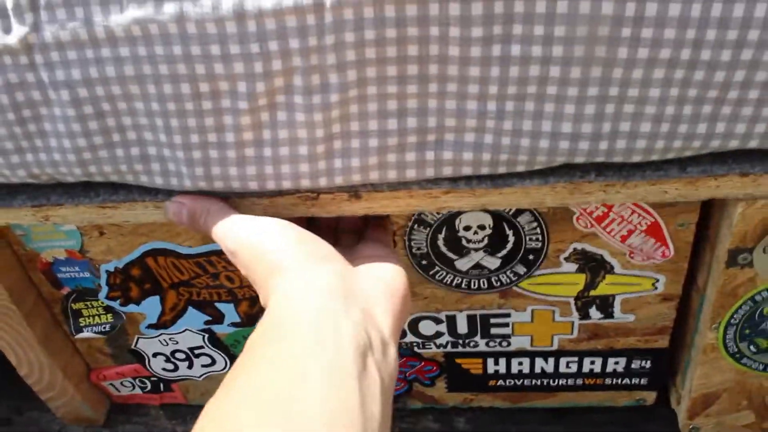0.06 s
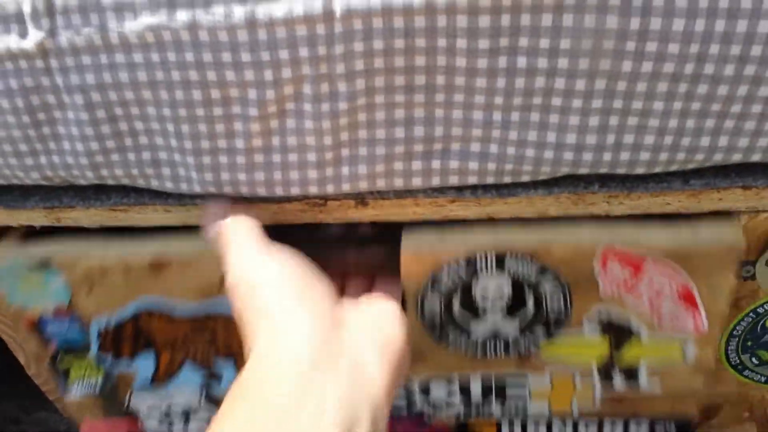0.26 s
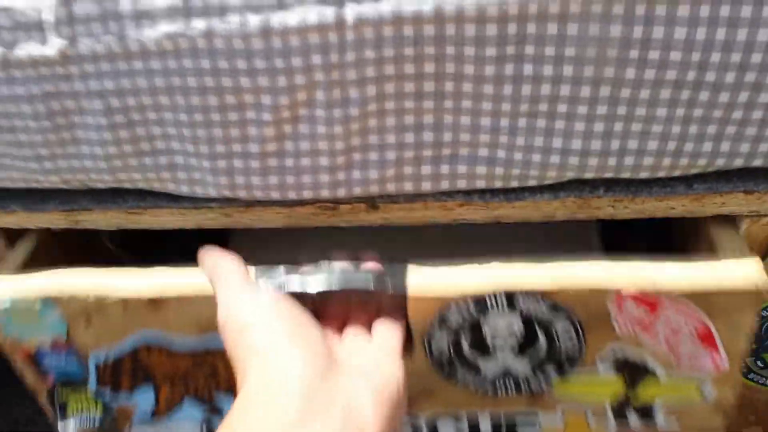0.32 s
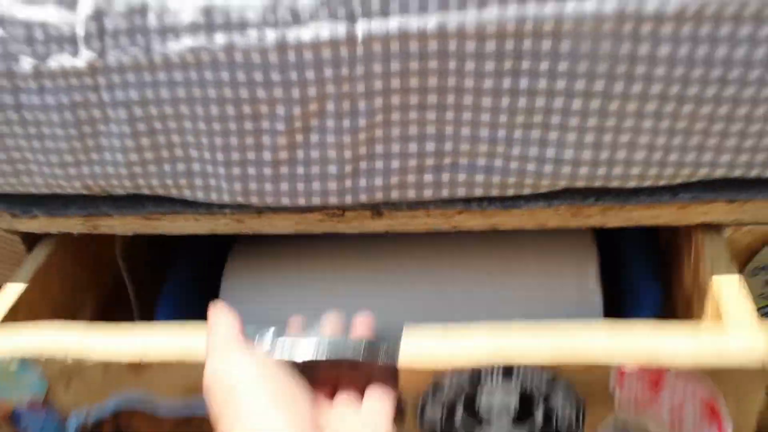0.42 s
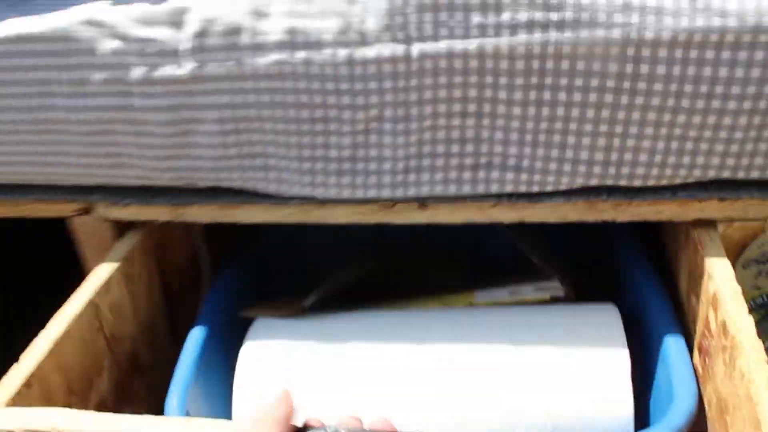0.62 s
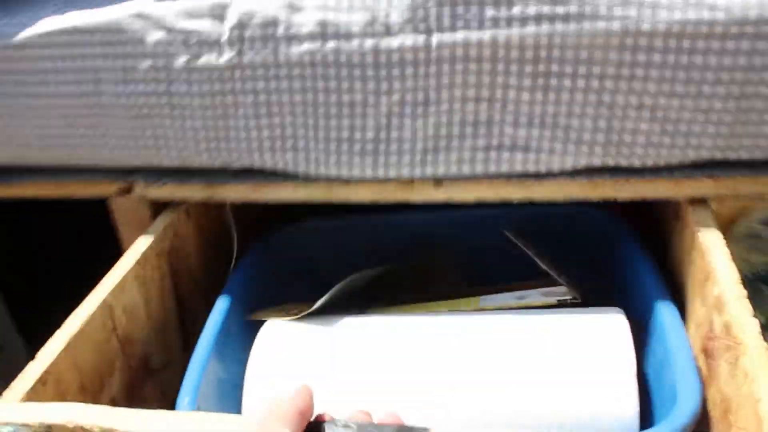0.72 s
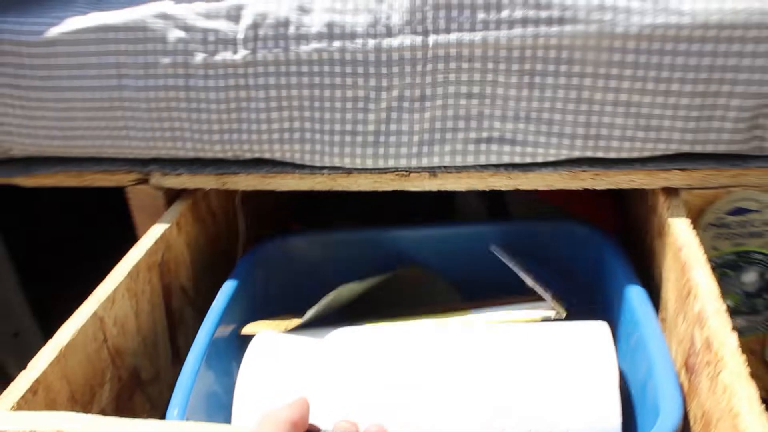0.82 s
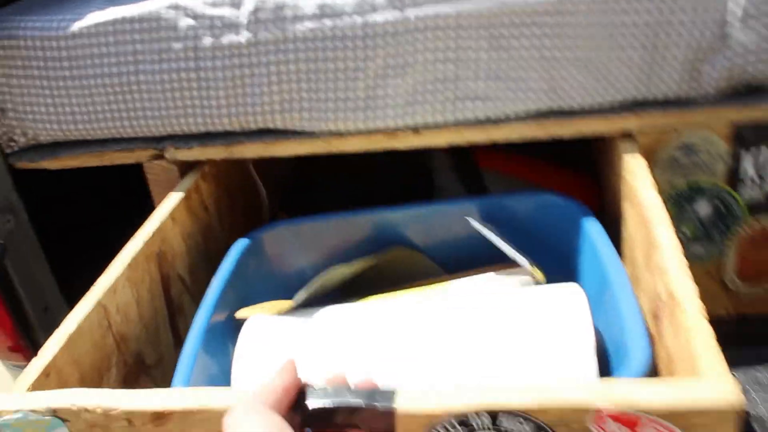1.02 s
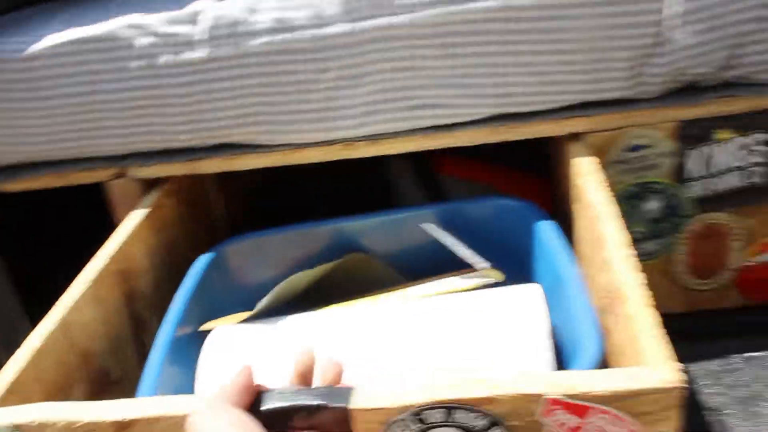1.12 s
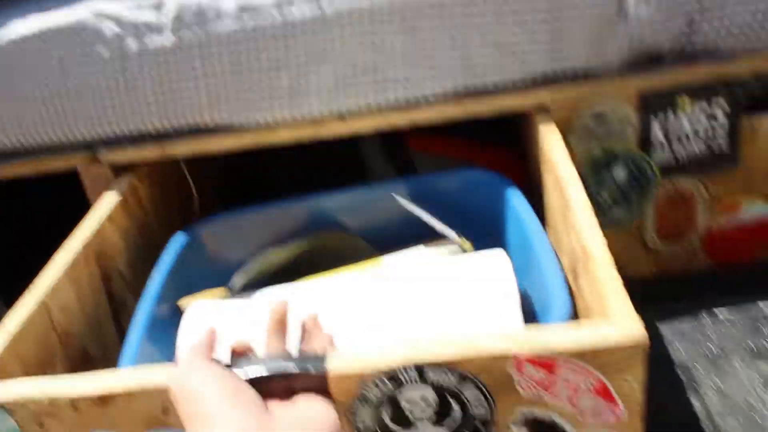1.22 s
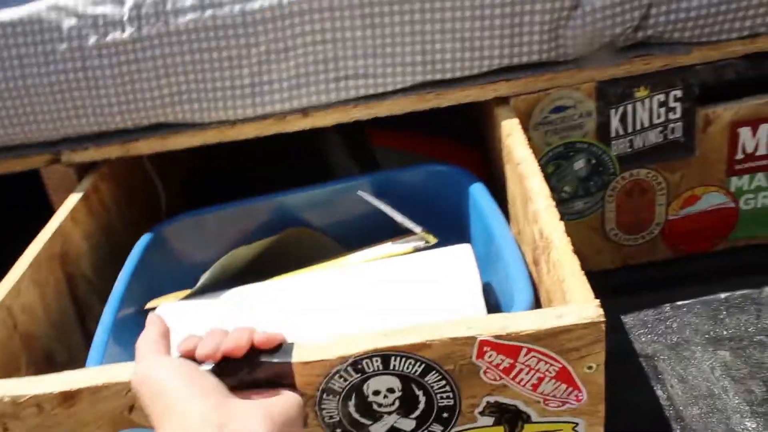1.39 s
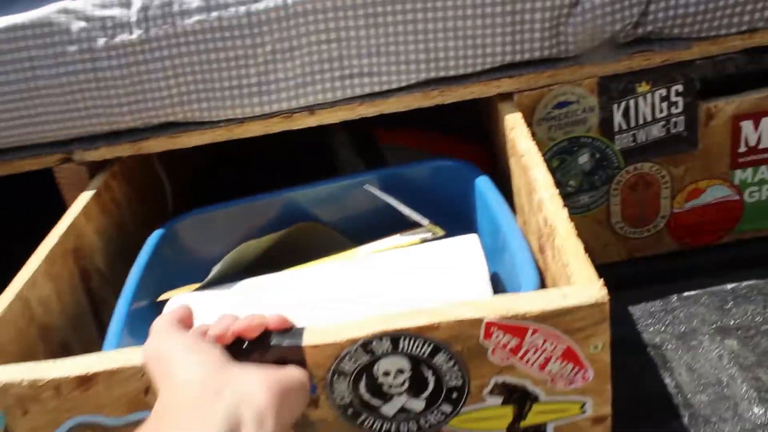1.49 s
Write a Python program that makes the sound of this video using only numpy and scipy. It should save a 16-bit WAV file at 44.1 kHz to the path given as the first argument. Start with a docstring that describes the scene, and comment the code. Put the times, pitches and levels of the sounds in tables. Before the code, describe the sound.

A wooden drawer is pulled open in a parked vehicle, scraping and juddering with low knocks and small rattles, then stopping before a brief scuff and faint ticks; close microphone, faint distant traffic behind.

```python
"""Plywood drawer pulled from a bed platform

A hand pulls the drawer out in a parked vehicle, over a far traffic wash of shaped noise.
Uneven clicks of wood slipping on wood ring the frame, the box (its tone changes on the way out) and thin panels.
Contents rustle as swells of crackle and tick as dying rings; low rings are the jolts.
Wavering tones hum where slips lock to a resonance, and faint squeaks are narrow noise.
A short dense scuff comes late, with a few faint ticks after it.
"""
import sys
import numpy as np
from scipy import signal
from scipy.io import wavfile

SR = 44100
rng = np.random.default_rng(int(sys.argv[2]) if len(sys.argv) > 2 else 0)


def materialize(psi):
    """Save the field psi as 16-bit PCM at rate SR to the path in sys.argv[1].

    A 1-D psi becomes a single channel; in a 2-D psi each row is a channel.
    """
    bounded = np.clip(np.atleast_2d(psi).T, -1, 1)
    quanta = np.round(bounded * 32767).astype(np.int16)
    wavfile.write(sys.argv[1], SR, quanta)


N = 68355
TIME_S = np.arange(N) / SR


def amp(db):
    """Decibels to linear gain."""
    return 10 ** (np.asarray(db) / 20)


def evened(x):
    """Scale to an rms of 1."""
    return x / np.sqrt(np.mean(x ** 2) + 1e-20)


def filtered(x, order, hz, kind="low"):
    """Butterworth low-pass or high-pass."""
    return signal.sosfilt(signal.butter(order, hz, kind, fs=SR, output="sos"), x)


def coloured(x, points):
    """Minimum-phase filter with the table's spectrum, falling away below its first point; rms 1."""
    point_hz, point_db = np.transpose(points)
    hz = abs(np.fft.fftfreq(4096, 1 / SR))
    log_gain = np.interp(np.log(hz + 1), np.log(point_hz), point_db) * np.log(10) / 20
    log_gain += 2 * np.log(np.clip(hz / point_hz[0], 1e-4, 1))
    # the Hilbert transform of the log gain gives the phase of a causal filter
    taps = np.fft.ifft(np.exp(np.conj(signal.hilbert(log_gain)))).real[:2048]
    return evened(signal.oaconvolve(x, taps)[:N])


def drift(cutoff_hz):
    """Random wavering of rms 1: noise low-passed at the cutoff."""
    return evened(filtered(rng.standard_normal(N), 2, cutoff_hz))


def slips(per_s, spread_db):
    """Stick and slip as random clicks of uneven size and either sign."""
    chance = rng.random(N)
    size = np.minimum(rng.exponential(1, N), 4)
    sign = rng.choice([-1., 1.], N)
    return (chance < per_s / SR) * sign * amp(spread_db * size)


def ring(x, hz, width_hz):
    """One damped mode as a two-pole resonator; a wider mode dies sooner."""
    r = np.exp(-np.pi * width_hz / SR)
    return evened(signal.lfilter([1, 0, -1], [1, -2 * r * np.cos(2 * np.pi * hz / SR), r * r], x))


def fuzzy_tone(hz, width_hz):
    """Noise through the same resonance twice: a rough tone around one pitch."""
    return ring(ring(rng.standard_normal(N), hz, width_hz), hz, width_hz)


# spectrum of far traffic and hiss: pitch_hz, relative_db_per_hz
WASH_SPECTRUM = [(15, -8), (25, -7), (783, 2), (946, 0.5), (1240, -4), (1660, -12), (1960, -14.5),
                 (2180, -19), (3170, -26), (4630, -27.5), (7710, -33.5), (15500, -34.5)]
WASH_DB, WASH_WAVER_DB, WASH_WAVER_HZ = -46.5, 1.4, 11.6


def wash():
    """Far traffic and microphone hiss: shaped noise, gently wavering."""
    level_db = WASH_DB + WASH_WAVER_DB * drift(WASH_WAVER_HZ)
    return amp(level_db) * coloured(rng.standard_normal(N), WASH_SPECTRUM)


def rung(x, modes, free):
    """Clicks ring a set of modes whose strengths change as the drawer comes out."""
    total, power = 0, 0
    for k, (hz, width_hz, enclosed_db, free_db) in enumerate(modes):
        gain = amp(enclosed_db + (free_db - enclosed_db) * free)
        total = total + (-1) ** k * gain * ring(x, hz, width_hz)  # alternating polarity
        power = power + gain ** 2
    return total / np.sqrt(power)


# course of the pull: time_s, frame_rumble_db, box_db, panel_scrape_db, grit_db
PULL_LEVELS = [(0.14, -51, -84, -82, -91), (0.162, -53, -68, -91, -89), (0.175, -45, -60, -43.5, -49),
               (0.189, -31, -57, -64, -57.5), (0.204, -31.5, -37.5, -48.5, -50),
               (0.268, -34.5, -29.5, -38, -42.5), (0.334, -30.5, -37, -37.5, -44),
               (0.356, -40, -36, -45.5, -44.5), (0.394, -45.5, -34.5, -38, -46),
               (0.46, -21, -32, -36.5, -47), (0.483, -44, -32.5, -34, -47.5),
               (0.51, -27, -26.5, -32, -48.5), (0.524, -27.5, -32.5, -40.5, -46),
               (0.592, -39, -36, -33, -45.5), (0.63, -28, -30, -32, -43), (0.734, -29, -34, -38.5, -48),
               (0.788, -36.5, -29, -35, -46), (0.818, -25.5, -32.5, -37, -45.5),
               (0.895, -31, -32.5, -34.5, -42), (0.928, -27.5, -27, -34, -44),
               (1.004, -30.5, -40, -43, -49), (1.018, -41, -43, -48.5, -51), (1.045, -33, -39, -44, -53),
               (1.07, -38, -41, -68, -56), (1.15, -54, -49, -59, -57), (1.276, -53, -69, -60, -60.5),
               (1.3, -69, -59, -55, -61)]
# modes of frame, box and thin panels: pitch_hz, width_hz, enclosed_relative_db, free_relative_db
FRAME_MODES = [(58.3, 51, 0.5, -2), (91.7, 50, -2, -6.5), (124.7, 56, 2.5, 10), (153.6, 30, -2.5, 5.5),
               (175.4, 5.9, -1, 3.5)]
BOX_MODES = [(240.6, 43, -8.5, -4), (319, 21.4, 3.5, -7), (351, 34, -1.5, -10.5), (400, 34.5, 0, -9.5),
             (491.4, 29, -6, -9), (565, 105, -7.5, -10.5)]
PANEL_MODES = [(649, 140, 2.2, 16), (835, 74, 12, 12.5), (913, 192, 26, 11), (1140, 264, 24.8, 11),
               (1376, 113, 23.4, 8.5), (1499, 28, 19.9, 5.5), (1620, 145, 20.7, 6.5),
               (1814, 50, 20.5, -2.5), (1952, 94, 23.2, -1)]
# spectrum of the fine grit: pitch_hz, relative_db
GRIT_SPECTRUM = [(2200, 14), (2900, 11), (3700, 5), (5000, 1.5), (6500, -3.5), (8500, -14), (15000, -22)]
# in order: frame, box, panels, grit
SLIPS_PER_S, SLIP_SPREAD_DB = (1500, 2000, 2200, 4000), (1.3, 1.5, 2.2, 2.2)
JUDDER_HZ, JUDDER_DB = 44, (0.46, 0.96, 0.83, 1.3)
CONTACT_HZ = (494, 1190, 3080)  # soft wood contact dulls the slips: frame, box, panels
OUT_MID_S, OUT_SPAN_S = 0.603, 0.042  # the box passes from mostly enclosed to mostly free


def drawer():
    """Slips under one shared judder drive frame, box, panels and grit."""
    free = .5 + .5 * np.tanh((TIME_S - OUT_MID_S) / OUT_SPAN_S)
    judder = drift(JUDDER_HZ)
    drive = [slips(n, spread_db) * amp(judder_db * judder)
             for n, spread_db, judder_db in zip(SLIPS_PER_S, SLIP_SPREAD_DB, JUDDER_DB)]
    parts = []
    for x, contact_hz, modes in zip(drive, CONTACT_HZ, (FRAME_MODES, BOX_MODES, PANEL_MODES)):
        parts.append(evened(rung(filtered(x, 2, contact_hz), modes, free)))
    parts.append(coloured(drive[-1], GRIT_SPECTRUM))
    time_s, *levels_db = np.transpose(PULL_LEVELS)
    return sum(amp(np.interp(TIME_S, time_s, level_db, left=-120, right=-120)) * part
               for level_db, part in zip(levels_db, parts))


# ticks of small things: start_s, level_db, pitch_hz, t60_s, roughness_0_to_1
TICK_EVENTS = [(0.172, -39, 2000, 0.06, 0.53), (.2965, -23, 1910, .025, .3), (0.3107, -27, 1470, .012, .2),
               (.330, -24, 1967, 0.042, 0.44), (.332, -25, 1096, .05, 0.65), (0.495, -36, 2950, 0.025, 0),
               (0.505, -31, 3110, 0.069, 0.36), (.507, -22, 1887, 0.041, 0.62),
               (0.532, -28, 1930, 0.022, 0.2), (1.172, -54, 6000, 0.0074, .5),
               (1.227, -40.5, 1840, 0.05, 0.69), (1.260, -46, 3120, 0.015, .6),
               (1.3509, -23, 870, 0.011, 0), (1.36, -25, 2000, 0.005, 0.2), (1.37, -28.5, 1350, 0.011, 0),
               (1.369, -36, 3040, 0.019, 0.3), (1.495, -48.5, 4100, 0.02, 0.18),
               (1.497, -48.5, 5250, 0.018, 0.3), (1.496, -43, 2210, 0.012, 0.7)]
TICK_WIDTH_SHARE = .16  # width of the rough part, as a share of the pitch
TICK_RISE_S = 0.00029


def ticks():
    """Each tick is a dying ring, more or less roughened around its pitch."""
    out = np.zeros(N)
    for start_s, level_db, hz, t60_s, rough in TICK_EVENTS:
        t = np.maximum(TIME_S - start_s, 0)
        rough = np.clip(rough, 0, 1)
        envelope = amp(level_db - 60 * t / t60_s) * (1 - np.exp(-t / TICK_RISE_S))
        fuzz = fuzzy_tone(hz, TICK_WIDTH_SHARE * hz)
        out += envelope * (rough * fuzz - (1 - rough) * np.sin(2 * np.pi * hz * t))
    return out


# bright rustles of the contents: start_s, length_s, level_db
RUSTLE_SWELLS = [(0.218, 0.13, -53), (0.321, 0.022, -52), (0.489, 0.055, -54.5), (0.586, 0.027, -47),
                 (0.603, 0.049, -46.5), (0.675, 0.043, -51), (0.768, 0.072, -53.5), (1.31, 0.099, -59.5)]
# spectrum of the rustle: pitch_hz, relative_db
RUSTLE_SPECTRUM = [(3000, 2.5), (5000, 2.5), (8000, -6), (12000, -17), (15500, -11)]
RUSTLE_SKEW = .55  # below 1 the swell rises faster than it falls


def rustles():
    """The contents shift: fine crackle in short swells that start quickly."""
    power = np.zeros(N)
    for start_s, length_s, level_db in RUSTLE_SWELLS:
        progress = np.clip((TIME_S - start_s) / length_s, 0, 1)
        power += amp(2 * level_db) * np.sin(np.pi * progress ** RUSTLE_SKEW)
    return np.sqrt(abs(power)) * coloured(slips(6000, spread_db=2.2), RUSTLE_SPECTRUM)


# the drawer jolts: start_s, level_db, pitch_hz, t60_s
KNOCK_EVENTS = [(0.336, -14, 132.4, 0.083), (.452, -13, 107, 0.11), (.995, -23, 117.7, 0.13),
                (1.152, -17, 90.5, 0.023)]
KNOCK_RISE_CYCLES = 0.97


def knocks():
    """Each jolt is one low dying ring."""
    out = np.zeros(N)
    for start_s, level_db, hz, t60_s in KNOCK_EVENTS:
        t = np.maximum(TIME_S - start_s, 0)
        rise = 1 - np.exp(-t * hz / KNOCK_RISE_CYCLES)
        out -= amp(level_db - 60 * t / t60_s) * rise * np.sin(2 * np.pi * hz * t)
    return out


HOLLOW_SMALL_HZ, HOLLOW_LARGE_HZ, HOLLOW_MID_S, HOLLOW_SPAN_S = 480, 424, 0.66, 0.038


def hollow_pitch():
    """The hollow behind the drawer drops in pitch as it grows."""
    grown = .5 + .5 * np.tanh((TIME_S - HOLLOW_MID_S) / HOLLOW_SPAN_S)
    return HOLLOW_SMALL_HZ + (HOLLOW_LARGE_HZ - HOLLOW_SMALL_HZ) * grown


def hum(hz, wander_hz, time_s, level_db):
    """A rough, wandering tone where the slips lock to one resonance."""
    db = np.interp(TIME_S, time_s, level_db, left=-120, right=-120)
    flutter_db = 3.2 * drift(70)
    pitch_hz = hz + wander_hz * drift(46.7)
    return amp(db + flutter_db) * evened(np.sin(2 * np.pi * np.cumsum(pitch_hz) / SR))


# course of the locked tones: time_s, box_hum_db, hollow_db
TONE_LEVELS = [(.46, -54, -45), (.505, -48, -32), (.57, -55, -43.5), (.632, -29, -34), (.688, -30.5, -30),
               (.742, -26.5, -41), (.77, -39, -44), (.803, -37, -43), (.816, -25, -37.5), (.868, -29, -39),
               (.905, -35, -40), (.93, -31.5, -29), (.97, -43, -41), (.995, -29.5, -51), (1.03, -53, -51)]
HUM_HZ, HUM_WANDER_HZ, HOLLOW_WANDER_HZ = 256, 6.3, 13.2  # wander as rms


def locked_tones():
    """The slips lock to the box's main mode and to the hollow."""
    time_s, box_db, hollow_db = np.transpose(TONE_LEVELS)
    box_hum = hum(HUM_HZ, HUM_WANDER_HZ, time_s, box_db)
    return box_hum + hum(hollow_pitch(), HOLLOW_WANDER_HZ, time_s, hollow_db)


# faint thin squeaks as the drawer slows: start_s, length_s, level_db, pitch_hz
SQUEAK_EVENTS = [(1.04, 0.04, -63, 4290), (1.063, 0.17, -62, 2900)]
SQUEAK_WIDTH_HZ = 150


def squeaks():
    """Narrow fuzzy whistles that swell and fade."""
    out = np.zeros(N)
    for start_s, length_s, level_db, hz in SQUEAK_EVENTS:
        swell = np.sin(np.pi * np.clip((TIME_S - start_s) / length_s, 0, 1))
        out += amp(level_db) * swell * fuzzy_tone(hz, SQUEAK_WIDTH_HZ)
    return out


# spectrum of the scuff: pitch_hz, relative_db
SCUFF_SPECTRUM = [(250, -2.5), (500, 4.5), (850, 2.5), (1500, -2.5), (2200, 3), (3200, -5.5), (5000, -14.5),
                  (8000, -23.5), (15000, -39)]
SCUFF_PEAK_S, SCUFF_RISE_S, SCUFF_FALL_S, SCUFF_DB = 1.358, .009, .014, -38


def scuff():
    """A brief dense rub that swells and dies."""
    t = TIME_S - SCUFF_PEAK_S
    pace_s = np.where(t < 0, SCUFF_RISE_S, SCUFF_FALL_S)
    swell = 1 / np.cosh(np.clip(t / pace_s, -20, 20))
    return amp(SCUFF_DB) * swell * coloured(slips(4000, spread_db=3.0), SCUFF_SPECTRUM)


CABIN_T60_S, CABIN_DB, CABIN_LOW_HZ = 0.3, -12, 680


def cabin(x):
    """A short dense tail from the walls of the vehicle, without bass."""
    t = np.arange(round(.2 * SR)) / SR  # the tail is cut off at 0.2 s
    tail = rng.standard_normal(len(t)) * amp(-60 * t / CABIN_T60_S) * (t > .003)
    tail = filtered(tail, 2, CABIN_LOW_HZ, "high")
    return x + amp(CABIN_DB) * signal.oaconvolve(x, tail / np.linalg.norm(tail))[:N]


def scene():
    """Wood and contents sound in the cabin; jolts and wash stay without its tail."""
    inside = drawer() + ticks() + rustles() + locked_tones() + squeaks() + scuff()
    return (cabin(inside) + knocks() + wash())[None]


MIC_LOW_HZ, EDGE_HZ = 55, 15690


def record(dry):
    """The microphone's bass roll-off and the band limit of the recorder."""
    thin = filtered(dry, 4, MIC_LOW_HZ, "high")
    band_limit = signal.firwin(1023, EDGE_HZ, window=("kaiser", 9), fs=SR)
    return signal.oaconvolve(thin, band_limit[None], "same")


dry = scene()
out = record(dry)
materialize(out)
```